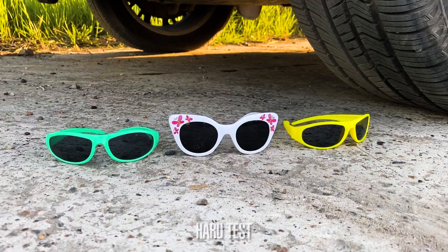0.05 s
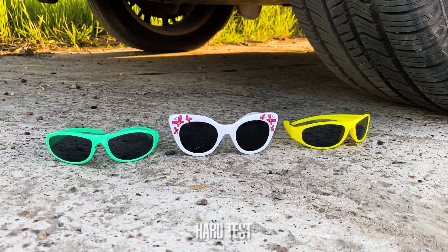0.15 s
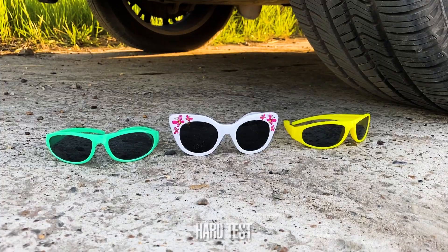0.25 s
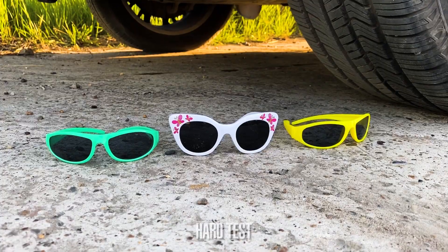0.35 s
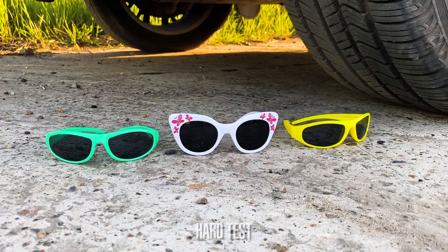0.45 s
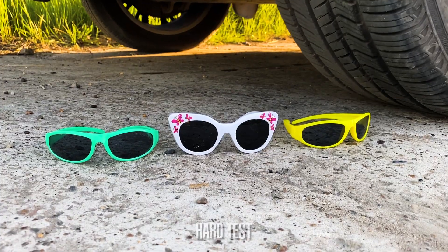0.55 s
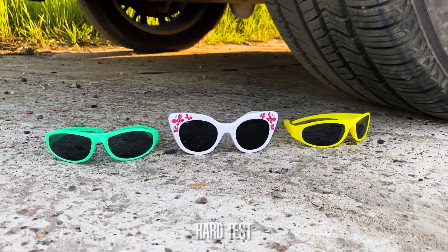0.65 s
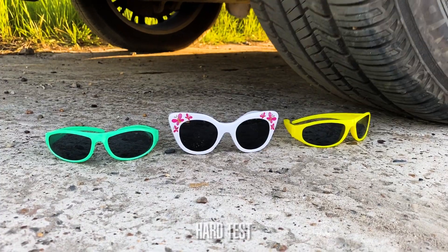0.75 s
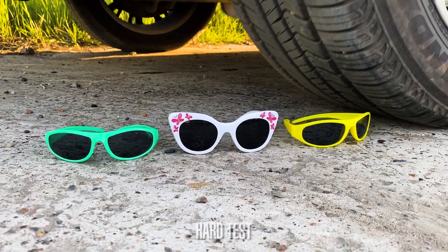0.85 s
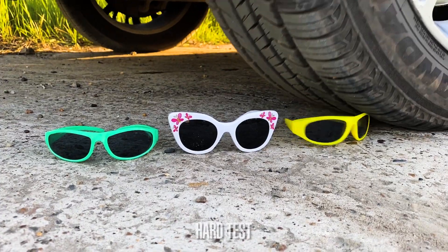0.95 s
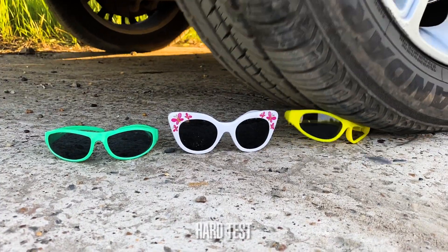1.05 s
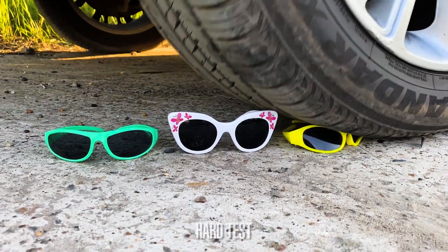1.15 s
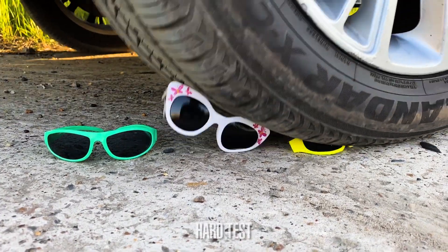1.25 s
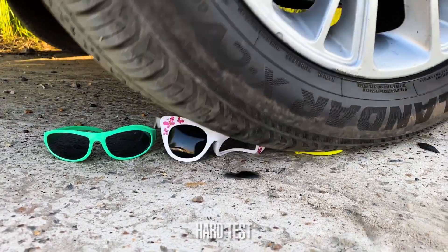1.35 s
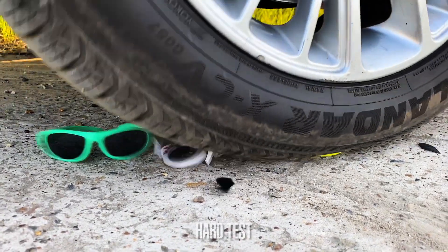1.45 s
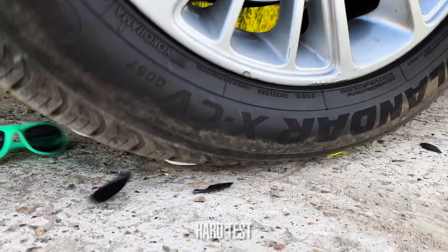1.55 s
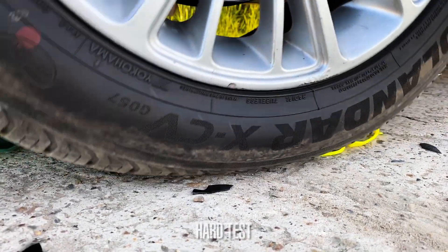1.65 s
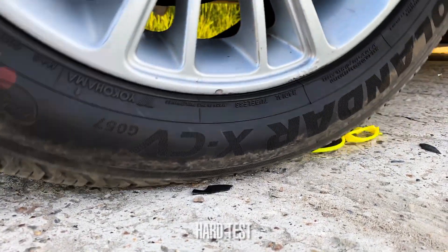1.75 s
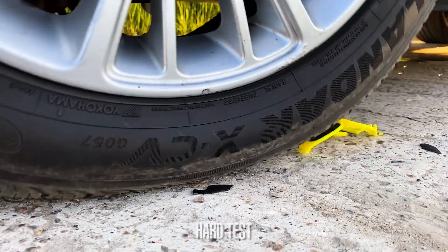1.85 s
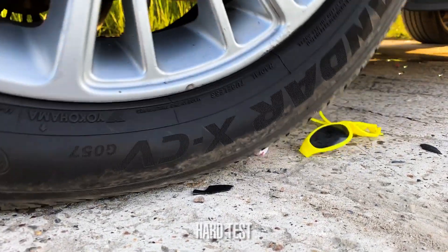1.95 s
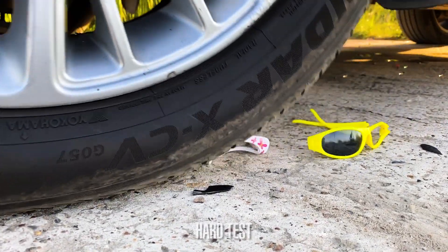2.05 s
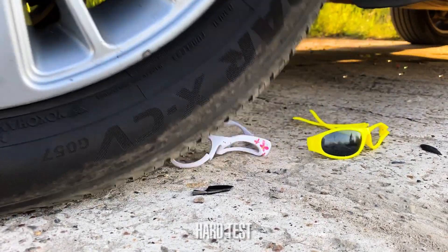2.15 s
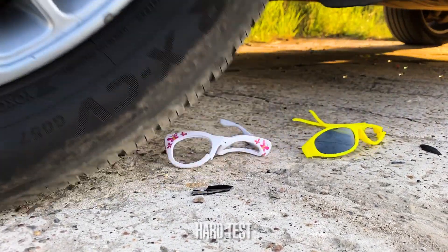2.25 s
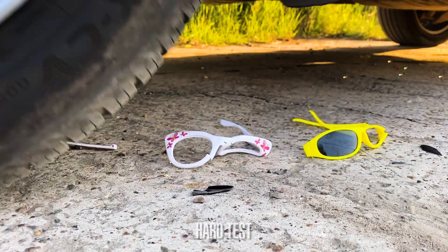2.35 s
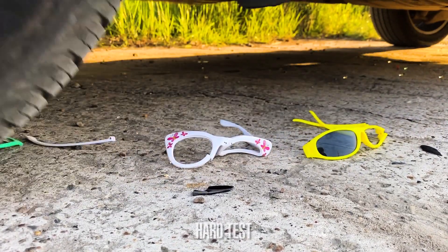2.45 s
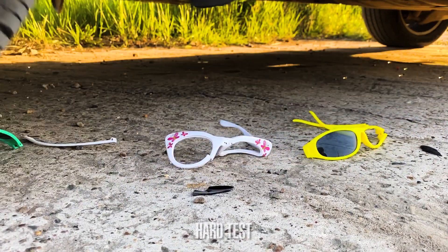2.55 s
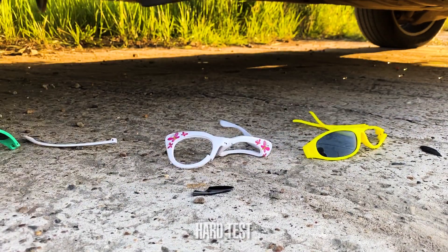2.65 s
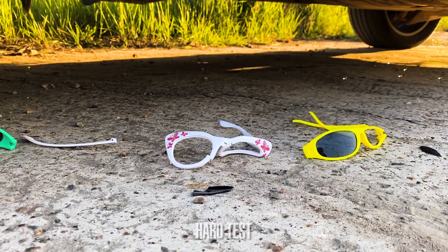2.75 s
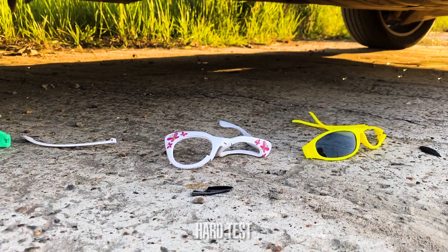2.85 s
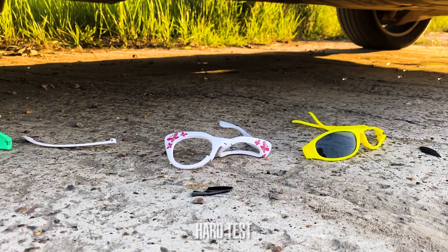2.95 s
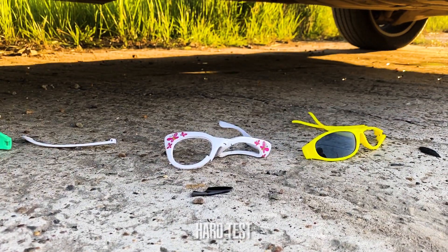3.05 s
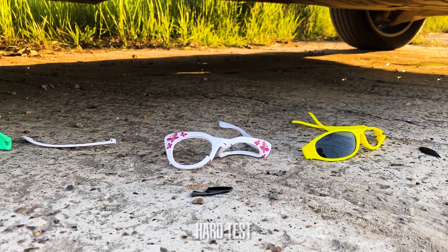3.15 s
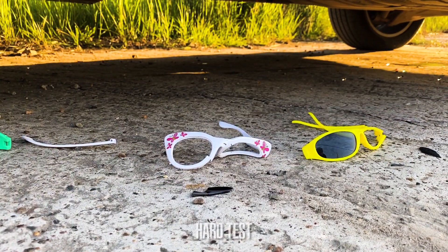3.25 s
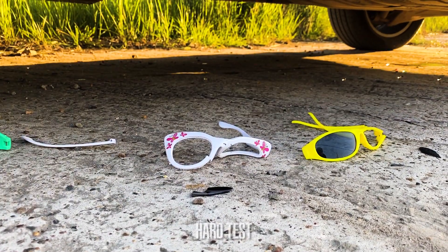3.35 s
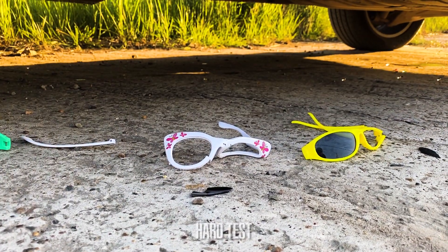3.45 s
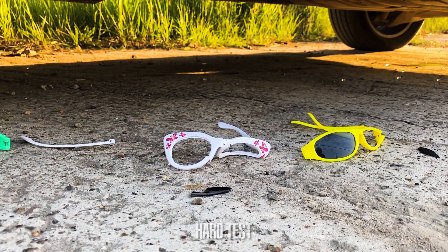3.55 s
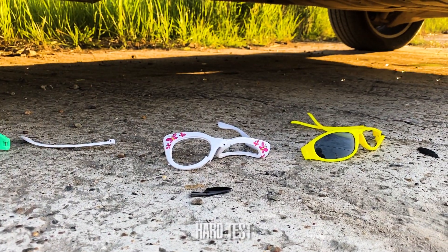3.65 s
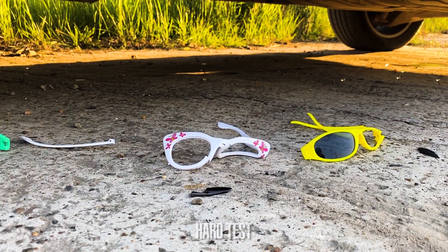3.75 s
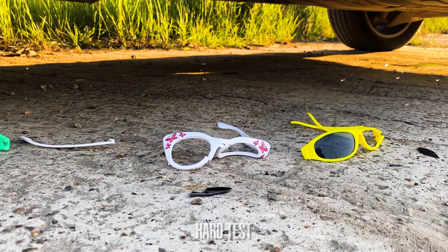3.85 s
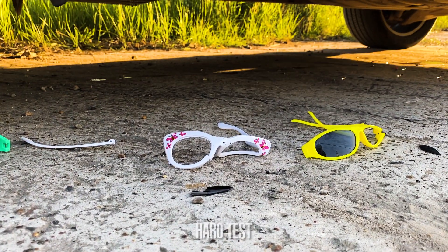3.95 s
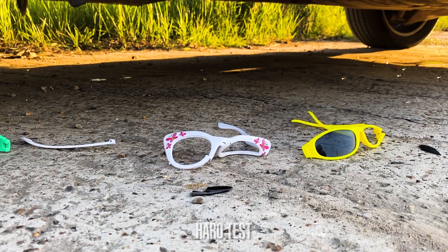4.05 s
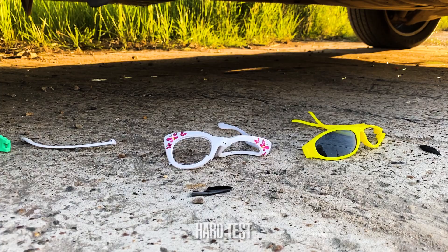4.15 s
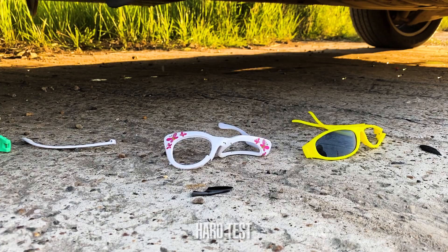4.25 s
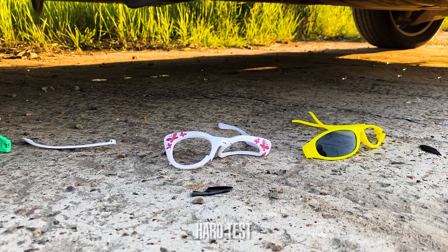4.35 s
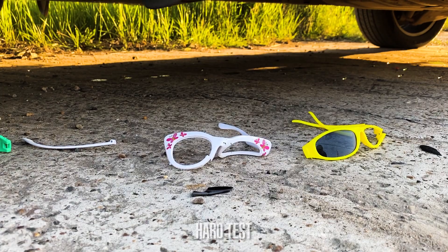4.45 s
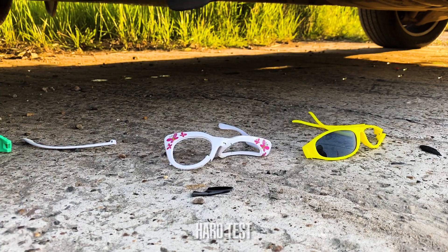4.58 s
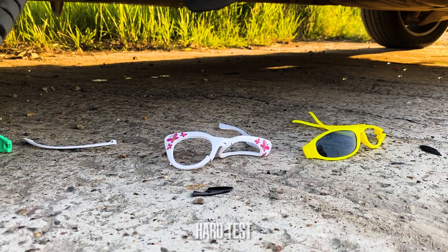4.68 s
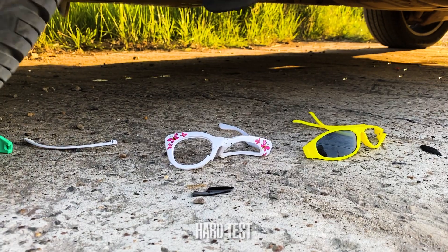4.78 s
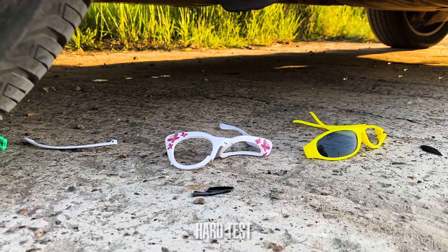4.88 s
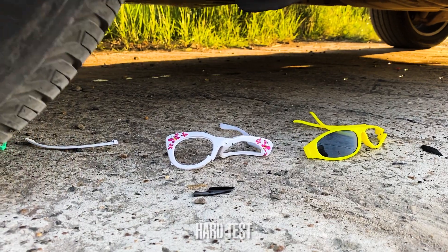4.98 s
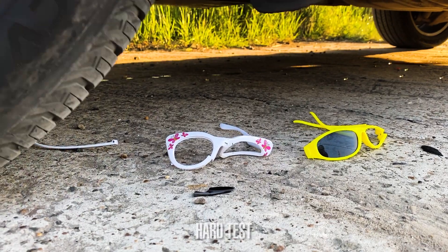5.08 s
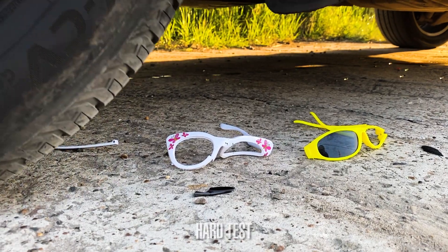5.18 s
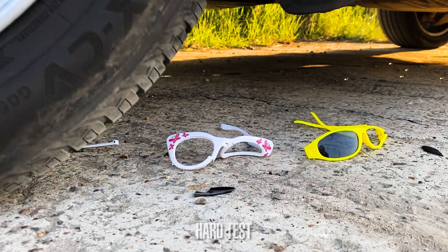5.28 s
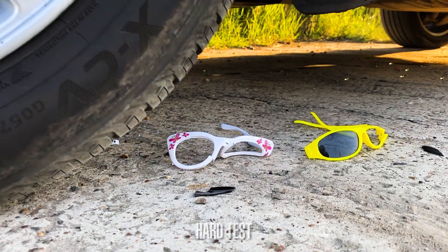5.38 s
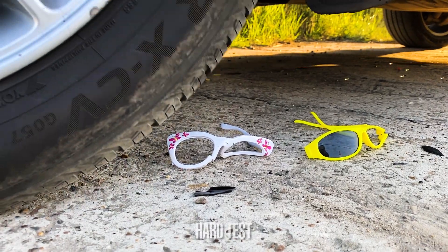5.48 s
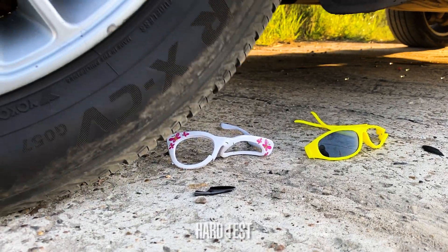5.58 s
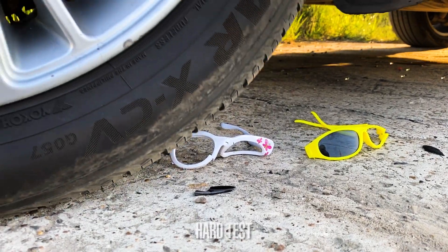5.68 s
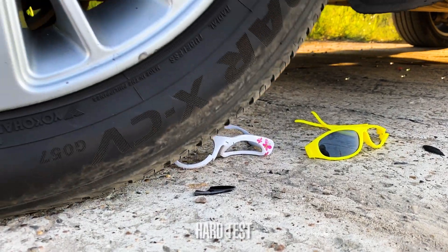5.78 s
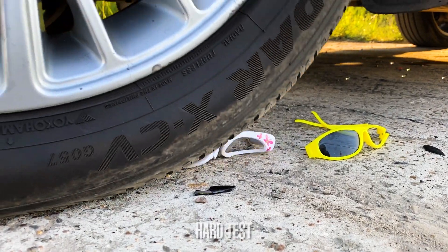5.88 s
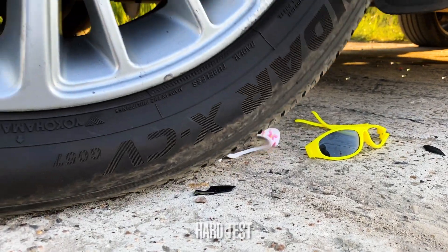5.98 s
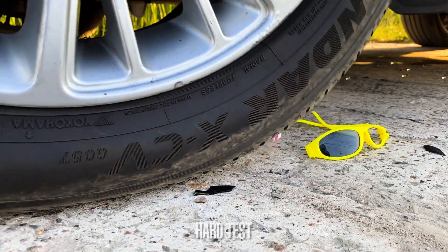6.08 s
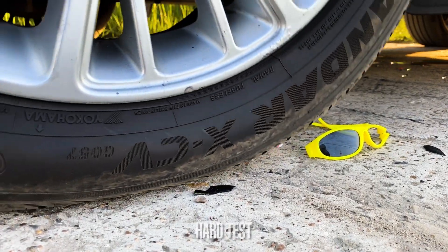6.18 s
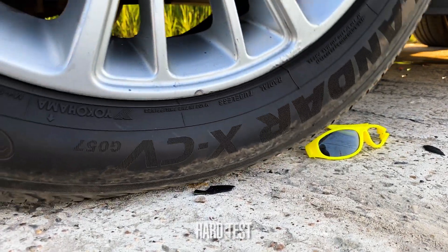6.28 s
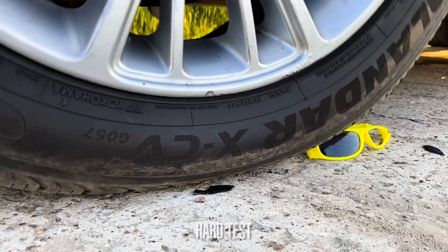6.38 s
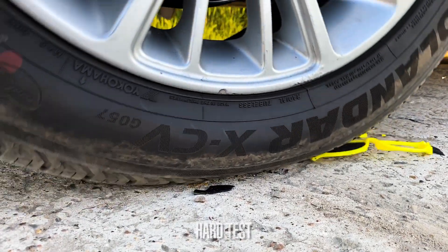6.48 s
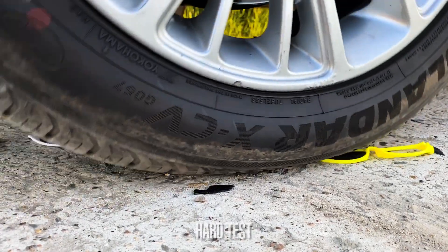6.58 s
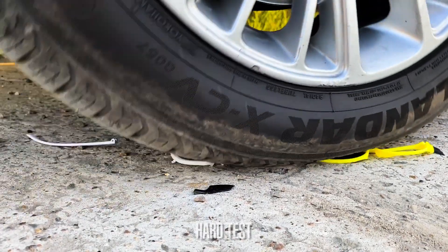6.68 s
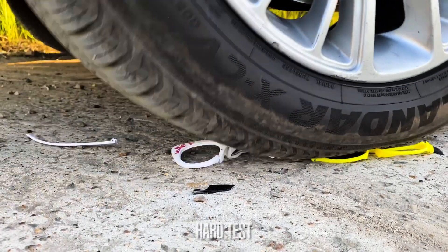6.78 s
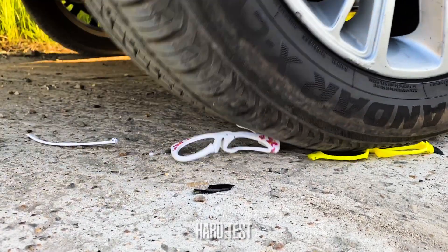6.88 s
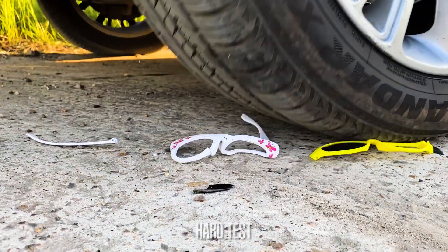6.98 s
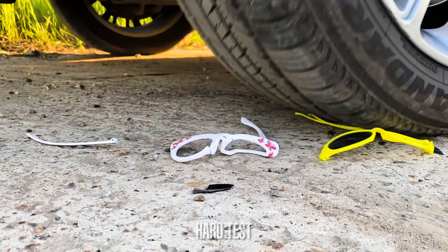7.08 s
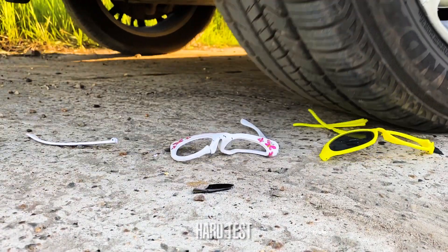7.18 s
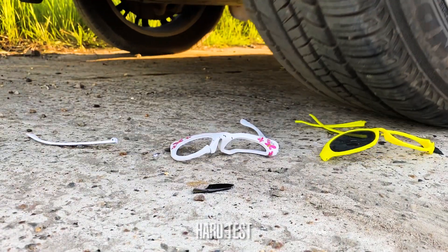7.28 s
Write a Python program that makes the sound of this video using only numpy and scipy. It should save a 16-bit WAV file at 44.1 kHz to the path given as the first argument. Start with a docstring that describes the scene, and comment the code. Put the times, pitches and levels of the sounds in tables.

```python
"""A cooling fan hums over the low throb and roar of an idling engine; then plastic snaps, knocks and crunches.
A car creeps forward and back over three plastic frames on concrete, the microphone on the ground beside them.
Sine lines make the hum and throb, coloured noise the roar and hiss, and resonators the whine and drone.
Noise bursts ring the broken pieces, falling sines knock, noise grains grind and low sines thud.
The volume of the car sound is turned up and down, partly in sudden steps."""
import sys
import numpy as np
from scipy import signal
from scipy.fft import rfft, irfft, next_fast_len
from scipy.io import wavfile
from scipy.ndimage import uniform_filter1d

SR = 44100
rng = np.random.default_rng(int(sys.argv[2]) if len(sys.argv) > 2 else 0)


def to_wav(s):
    """Save 16-bit WAV."""
    ch = np.atleast_2d(s).T  # columns
    pcm = np.round(np.clip(ch, -1, 1) * 32767)  # PCM
    wavfile.write(sys.argv[1], SR, pcm.astype(np.int16))


N = 322812
TIME = np.arange(N) / SR


def from_db(db):
    """Logarithmic level: decibels to amplitude gain."""
    return 10 ** (np.asarray(db) / 20)


def rms_one(x):
    """Power normalisation: scale to rms 1."""
    return x / np.sqrt(np.mean(x ** 2) + 1e-20)


def loudest_one(x):
    """Short-time power: scale so that the loudest stretch of 30 samples has peak height about 1."""
    power = uniform_filter1d(np.mean(x ** 2, 0), size=30)
    return x / np.sqrt(2 * power.max() + 1e-20)


def in_time(rows):
    """Linear interpolation: one value per sample for each column after t."""
    s, *columns = np.transpose(rows)
    return [np.interp(TIME, s, column) for column in columns]


def at_hz(points, hz):
    """Logarithmic frequency: interpolate a table of (f/Hz, value)."""
    table_hz, values = np.array(points).T
    return np.interp(np.log(hz), np.log(table_hz), values)


def drift(rate_hz):
    """Low-passed random process: slow fluctuation with rms 1."""
    step = 40   # samples per slow value
    r = np.exp(-2 * np.pi * step * rate_hz / SR)
    white = rng.standard_normal(N // step + 2002)
    slow = signal.lfilter([1], [1, -2 * r, r * r], white)[2000:]   # the settling part is dropped
    return np.interp(np.arange(N) / step, np.arange(len(slow)), rms_one(slow))


def noise(spectrum, alike, lead=((1, 0), (2, 0))):
    """Interchannel coherence: stereo noise of given colour, likeness and left phase lead, at rms 1."""
    size = next_fast_len(N)
    hz = np.maximum(np.arange(size // 2 + 1) * SR / size, 1)
    mid, side = rfft(rng.standard_normal((2, size))) * from_db(at_hz(spectrum, hz))
    likeness = np.clip(at_hz(alike, hz), 0, 1)
    mid = np.sqrt(1 + likeness) * mid
    side = np.sqrt(1 - likeness) * side
    left = mid + side
    right = (mid - side) * np.exp(-1j * at_hz(lead, hz))
    return rms_one(irfft([left, right], size)[:, :N])


def band(x, kind, hz):
    """Frequency selection: second-order Butterworth filter."""
    return signal.sosfilt(signal.butter(2, hz, kind, fs=SR, output="sos"), x)


def resonance(x, hz, width_hz):
    """Damped oscillator: a two-pole peak with gain about 1 on top."""
    r = np.exp(-np.pi * width_hz / SR)
    zeros = np.array([1, 0, -1]) * (1 - r * r) / 2
    return signal.lfilter(zeros, [1, -2 * r * np.cos(2 * np.pi * hz / SR), r * r], x)


def resonant_bands(white, hz, width_hz):
    """Cascaded resonance: the peak applied twice narrows noise to a blurred tone at rms 1."""
    return rms_one(resonance(resonance(white, hz, width_hz), hz, width_hz))


# Blade passing rate before its random drift: (t/s, f/Hz)
BLADE_RATE = [(0, 146.5), (.47, 144.3), (.9, 135.8), (1.59, 139.7), (3.5, 141.1), (4.05, 140.5),
              (6.0, 140.4), (6.3, 146.7), (6.56, 146.4), (6.95, 139.7), (7.32, 134.7)]
# Lines of the fan: (multiple of the blade rate, base level/dB)
FAN_LINES = [(.5, -8.5), (1, 0), (2, -19), (5, -21)]


def fan(late_ms, bump_db):
    """Blade-passing tone: sine lines at multiples of a drifting blade rate."""
    rate_hz = in_time(BLADE_RATE)[0] * (1 + 0.00588 * drift(3.55))
    blades = 2 * np.pi * np.cumsum(rate_hz) / SR
    half_db = -5 + 22 * late_ms - bump_db   # the lowest line takes no part in the level bumps
    second_db = 11 / (1 + np.exp((TIME - 0.7) / 0.037)) - 1.5   # stronger until about 0.7 s
    fifth_db = -11 + 49 * late_ms
    hum = 0
    for (multiple, db), share_db in zip(FAN_LINES, [half_db, 0, second_db, fifth_db]):
        gain = from_db(db + share_db + 1.2 * drift(2.6))
        hum = hum + gain * np.sin(multiple * blades + rng.uniform(0, 6.7))
    return hum


# Engine firings, idle with one touch of throttle: (t/s, f/Hz before drift, throb level relative to hum/dB)
FIRINGS = [(0, 44.3, -5), (.7, 43.2, -21), (2.6, 43.46, -7.5), (5.1, 44.2, -13), (6.06, 44.4, -13),
           (6.24, 52.7, -0.5), (6.5, 55.2, -15), (6.97, 49.2, -6), (7.32, 48.4, -32)]


def firing_throb(bump_db):
    """Periodic excitation: firing rate, its drifting phase, and a throb of two harmonics."""
    firing_hz, throb_db = in_time(FIRINGS)
    firing = 2 * np.pi * np.cumsum(firing_hz * (1 + 0.0057 * drift(1.15))) / SR
    gain = from_db(throb_db - bump_db + 0.63 * drift(5))   # takes no part in the level bumps
    return firing_hz, firing, gain * (np.sin(firing) + 0.35 * np.sin(2 * firing))


# Roar colour: (f/Hz, relative density level/dB)
ROAR_COLOUR = [(25, -20), (38, -27), (70, -9), (100, -10), (190, -12), (250, -18.5), (330, -17.5),
               (620, -19.5), (900, -22.5), (1380, -27), (2900, -33), (4800, -40), (7200, -42), (8200, -57)]
# Roar coherence: (f/Hz, left-right likeness)
ROAR_LIKENESS = [(50, .998), (150, 0.82), (400, 0.89), (800, 0.77), (1400, 0.59), (3000, 0.043),
                 (7000, 0.073)]


def roar(roar_db, bright_db, firing):
    """Amplitude modulation: broadband noise pulses with the firings and reflects from the concrete."""
    whole = noise(ROAR_COLOUR, ROAR_LIKENESS)
    top = band(whole, "high", 1100)
    lows = (whole - top) * from_db(1.64 * drift(21.4))   # the lows are lumpier
    sound = lows + from_db(bright_db + 0.55 * drift(15)) * top
    lag = round(1.82 * SR / 1000)   # ms to samples: the path by way of the concrete
    sound[:, lag:] += 0.14 * band(sound, "high", 270)[:, :N - lag]
    # alternate cylinders are louder, so the roar pulses at half the firing rate too
    pulse_db = 0.9 * np.sin(firing) + 0.24 * np.sin(firing / 2)
    return sound * from_db(roar_db + 1.0 + pulse_db)


# Blurred bands of the drone: (f/Hz, width of each pass/Hz, relative level/dB)
DRONE_BANDS = [(594, 94, 0.5), (1027, 90, -14.5), (1920, 210, -12.5), (2940, 280, -14)]


def drone(white, hum_db, firing_hz):
    """Resonant filtering: noise bands grow with the hum level and the firing rate."""
    level_db = -5 + 0.44 * hum_db + 0.5 * (firing_hz - 43.8)   # 0.5 dB per Hz over idle
    bands = sum(from_db(db) * resonant_bands(white, hz, width_hz) for hz, width_hz, db in DRONE_BANDS)
    return from_db(level_db) * bands


# Belt-driven parts: (f/Hz, width of each pass/Hz, relative level/dB)
WHINE_BANDS = [(2240, 160, -5), (2950, 300, -2), (4400, 700, 2), (4680, 70, -5)]


def whine(white, late_ms):
    """Narrow-band noise: belt-driven parts sing in bands of wandering level."""
    bands = 0
    for hz, width_hz, db in WHINE_BANDS:
        bands = bands + from_db(db + 1.22 * drift(3.7)) * resonant_bands(white, hz, width_hz)
    return from_db(-39 + 62 * late_ms) * bands


# Treble colour: (f/Hz, relative density level/dB)
HISS_COLOUR = [(6500, -41), (7800, 14), (8600, -2), (10000, 5.5), (11200, -0.5), (12000, -58), (13000, 1.5),
               (14500, 4.5), (15500, -6), (16800, -28)]
# Treble phase between channels: (f/Hz, left lead/rad)
TREBLE_LEAD = [(8000, -2.5), (8800, -.8), (9500, .8), (10700, -.5), (13400, .6), (14800, -1.3)]


def hiss(roar_db, bright_db):
    """Partially coherent noise: treble follows the roar and brightness with chance fluctuation."""
    treble = noise(HISS_COLOUR, [(1, 0.59), (2, 0.59)], TREBLE_LEAD)
    return treble * from_db(-25.5 + roar_db + bright_db + 1.8 * drift(12))


# Volume of the car sound, turned up and down, partly in sudden steps:
# (t/s, hum base level/dB, roar level relative to hum/dB)
CAR_VOLUME = [(0, -38.5, -0.5), (1.0, -36.5, -3), (1.075, -42, -1.5), (1.3, -51.5, 12), (1.6, -44.5, -3.5),
              (1.75, -35.5, -3), (2.113, -36.5, -2.5), (2.118, -51, -2.5), (2.65, -45.5, -4),
              (3.9, -45, -3.5), (4.5, -40.5, -5), (5.03, -39.5, -4), (5.25, -32.5, -5.5), (5.34, -23, -5.5),
              (5.75, -22.5, -8.5), (6.3, -23, -3.5), (6.5, -24.5, -0.5), (6.55, -26.5, -3.5),
              (7.013, -29, -1.5), (7.018, -39.5, -4), (7.32, -43, -2)]
# The engine bay moves past: (t/s, right channel delay/ms, brightness level/dB)
ENGINE_PLACE = [(0, .036, -1), (1.3, 0.086, 1), (3.4, 0.31, 1), (5.0, 0.21, 0.5), (5.35, 0.19, 2),
                (5.9, 0.16, 2.5), (6.7, 0.057, 3.5), (7.32, .04, 1)]


def car():
    """Superposition: all engine sources share one volume, with interchannel delay and level difference."""
    hum_db, roar_db = in_time(CAR_VOLUME)
    late_ms, bright_db = in_time(ENGINE_PLACE)
    bump_db = level_bumps()
    firing_hz, firing, throb = firing_throb(bump_db)
    white = rng.standard_normal((2, N))   # shared by drone and whine
    near = np.sqrt(2) * (fan(late_ms, bump_db) + throb) + drone(white[0], hum_db + bump_db * 0, firing_hz)
    near = near + roar(roar_db, bright_db, firing) + whine(white, late_ms)
    near[1] = np.interp(TIME - late_ms / 1000, TIME, near[1])
    pan_db = -0.3 + 4.1 * late_ms   # left over right
    panned = near * from_db([pan_db / 2, -pan_db / 2])
    return from_db(hum_db + bump_db) * (panned + hiss(roar_db, bright_db))


# Colour of splintering plastic: (f/Hz, relative density level/dB)
PLASTIC_COLOUR = [(710, -10), (1200, -15.5), (1560, -12), (2690, -4.5), (3430, -5), (5630, -3), (8470, -10),
                  (10700, -11), (12100, -25), (14400, -5.5), (16800, -38)]


def splinter():
    """Spectral shaping: stereo noise with the colour of breaking plastic."""
    likeness = [(1500, 0.75), (3000, 0.79), (5500, 0.67), (9000, 0.65)]
    lead = [(1000, 0.28), (3000, 0.21), (5500, 1.8)] + TREBLE_LEAD
    return noise(PLASTIC_COLOUR, likeness, lead)


# Grit and splinters under the tread, one list forward and one back: (t/s, relative level/dB)
GRIT_LEVEL = [
    [(1.0, -49), (1.05, -34), (1.1, -66), (1.33, -33), (1.41, -54), (1.6, -44.5), (1.9, -38), (2.116, -43)],
    [(4.93, -62), (5.12, -27), (5.22, -57), (5.8, -59), (6.1, -36), (6.54, -47), (6.62, -63), (6.86, -52),
     (6.92, -37), (7.016, -44)],
]


def grit():
    """Random point process: dense uneven grains, each a short puff of band-filtered splintering noise."""
    level = 0
    for rows in GRIT_LEVEL:
        active = (TIME >= rows[0][0]) * (TIME < rows[-1][0])
        level = level + from_db(in_time(rows)[0]) * active
    fade = np.exp(-1 / (0.0018 * SR))   # decay over 1.8 ms
    whole, grains = splinter(), 0
    clumps = from_db(3.0 * drift(21.0))
    for hz in 1700 * 2 ** np.arange(0, 3.2, 0.5):
        sizes = from_db(5.0 * np.minimum(rng.exponential(1, N), 4.5))
        born = rng.random(N) < 120 * clumps / SR   # 120 grains per second, times the clumping
        puffs = signal.lfilter([1], [1, -fade], sizes * born + 1e-18)
        grains = grains + resonance(whole, hz, 0.18 * hz) * puffs
    return from_db(-6.0) * level * rms_one(grains)


# Brief level changes of the background: (t/s, level change/dB, length with edges/s)
LEVEL_BUMPS = [(1.009, 17, 0.071), (4.965, 16.5, 0.041), (6.423, -2.5, 0.036)]


def level_bumps():
    """Trapezoidal envelope: each brief level change in dB has an edge, a hold and an edge."""
    total_db = 0
    for s, db, length in LEVEL_BUMPS:
        inside = np.minimum(TIME - s, s + length - TIME)
        total_db = total_db + db * np.clip(inside / 0.0133, 0, 1)   # edge in seconds
    return total_db


# A frame knocks on the concrete: (t/s, relative level/dB, settled f/Hz)
FRAME_KNOCKS = [(1.0176, -23.5, 690), (1.0633, -21.5, 382), (1.154, -32, 740), (1.174, -35, 770),
                (1.212, -17.5, 940), (1.2155, -21, 440), (1.2272, -16, 653), (1.258, -11.5, 593),
                (1.2697, -8, 587), (1.2915, -21, 410), (1.3032, -21.5, 985), (1.361, -20, 845),
                (1.37, -21.5, 332), (1.413, -36, 500), (1.4258, -20, 510), (1.4413, -30, 472),
                (1.4853, -17, 613), (1.5309, -21, 806), (1.695, -31, 730), (1.7736, -24.5, 600),
                (1.8648, -32.5, 810), (1.9047, -27, 860), (1.9357, -22.5, 388), (1.947, -24, 382),
                (1.9923, -22.5, 620), (2.0679, -22.5, 720), (2.206, -39.5, 740), (4.9508, -17, 940),
                (4.996, -24, 400), (5.1009, -21.5, 930), (5.1151, -18.5, 428), (5.1297, -22.5, 580),
                (5.2137, -23.5, 630), (5.3764, -23, 775), (5.5071, -14.5, 627), (6.4663, -22, 670),
                (6.4834, -17, 1050), (6.4954, -22, 674), (6.8203, -6, 490), (6.8629, -6.5, 620),
                (6.916, -17, 423)]


def knocks():
    """Damped vibration: a knock falls in pitch while the frame grinds on the concrete around that pitch."""
    builds_cycles, rings_cycles = 0.733, 1.32
    size = 3000
    out, t = np.zeros((2, N + size)), np.arange(size) / SR
    rough = noise([(150, 7), (2500, -23)], [(200, 1.0), (1500, 0.45)], [(200, 0.15), (1200, 0.92)])
    starts = (rng.random(len(FRAME_KNOCKS)) * (N - size)).astype(int)
    for (s, db, hz), i in zip(FRAME_KNOCKS, starts):
        cycles = hz * (t + 0.0016 * (1 - np.exp(-t / 0.0028)))   # starts sharp and settles
        knock = np.sin(2 * np.pi * cycles) + 0.15 * np.sin(2 * np.pi * 1.7 * cycles)
        builds = (1 - np.exp(-t * hz / builds_cycles)) ** 2
        knock *= from_db(11.5) * np.exp(-t * hz / rings_cycles) * builds
        grind = resonance(rough[:, i:i + size] * np.exp(-t / 0.0063) * builds, hz, 0.85 * hz)
        at = round((s - builds_cycles / hz) * SR)
        out[:, at:at + size] += from_db(db) * (knock + from_db(-1.0) * loudest_one(grind))
    return out[:, :N]


# Plastic snaps and short scrapes:
# (t/s, overall level/dB, ring f/Hz, relative noise level/dB, relative treble level/dB, nominal length/ms)
PLASTIC_SNAPS = [(1.0171, -15, 1880, 7.5, -9, 2.4), (1.0512, -22, 2900, 7.5, -10, 10),
                 (1.0612, -10, 7160, 6.5, -4, 2.9), (1.091, -38, 1700, 7, 0, 4.4),
                 (1.1094, -42.5, 3850, 5, 5, 4.8), (1.1537, -26.5, 2840, -8, -25, 2.1),
                 (1.1723, -29, 1460, -8, -25, 4.3), (1.21, -12.5, 1490, 3.5, -13, 5.2),
                 (1.2162, -14.5, 4100, -2, -14, 2.2), (1.2264, -8, 2200, -4, -18, 3.5),
                 (1.25, -7.5, 3960, 4.5, -25, 1.7), (1.2619, -10.5, 2520, 3.5, -6, 6.4),
                 (1.2673, -8.5, 1640, -1, -7, 1.7), (1.283, -18, 2670, -9, -27, 1.7),
                 (1.292, -26, 1660, 11, -9, 3.3), (1.303, -15.5, 4860, 5.5, 2.5, 2.3),
                 (1.339, -33, 4620, 8, 0, 22), (1.3596, -14.5, 2450, 7, 1, 1.7),
                 (1.3681, -15, 7650, 7.5, 1, 5.6), (1.373, -25, 7400, -2, -2, 7.1),
                 (1.4236, -20.5, 1540, -6, -17, 7.1), (1.4402, -20.5, 4930, 5.5, -4, 3.7),
                 (1.4492, -22, 1870, -7, -21, 4.5), (1.4839, -13.5, 6070, 5, -1.5, 8),
                 (1.529, -15.5, 7100, 0, -1.5, 9.3), (1.5787, -32.5, 6750, 4, -2, 2.3),
                 (1.67, -32.5, 7680, -16, -10, 9.7), (1.7191, -36, 4770, -3, -20, 2.7),
                 (1.7394, -37, 7530, -15, 10, 1.3), (1.772, -36, 6170, 16, 8, 2.2),
                 (1.8229, -28, 6950, 9, -8, 1.3), (1.862, -28, 2990, -2, -15, 5.8),
                 (1.873, -28.5, 2880, -10, -26, 33), (1.9144, -23.5, 2830, 6, -13, 2.6),
                 (1.923, -15, 2880, 7, -28, 3.6), (1.9352, -10.5, 3150, 6.5, -4.5, 7.8),
                 (1.9591, -25.5, 4467, -4, -5, 3), (2.035, -32, 6000, -2, 1.5, 14),
                 (2.0666, -15, 3400, 11.5, 4, 1.3), (2.066, -26.5, 3750, 10.5, -8, 14),
                 (2.092, -37, 6000, 1, -5, 2.2), (2.148, -49.5, 2180, 4.5, 1, 2.8),
                 (2.289, -51, 5000, 2, 0, 2), (2.452, -41, 6700, 11.5, 3, 2.1),
                 (2.471, -38, 6370, -10, -5, 1.9), (2.5325, -41, 2700, 6, -11, 3.4),
                 (2.546, -41, 2700, 1, -6, 3.5), (2.8585, -40, 2780, -6, -29, 1.7),
                 (3.952, -39.5, 1350, -9, -24, 39), (4.3552, -33.5, 4430, -5, -9, 2.6),
                 (4.364, -30.5, 4280, -13, -21, 2.5), (4.8618, -37.5, 2630, 1, -24, 2.8),
                 (4.92, -36, 2590, 2, -13, 4.9), (4.949, 2, 2970, -11.5, -24, 7.4),
                 (4.9502, -3, 2180, -6, -22, 5.5), (4.9572, -17, 2700, -23, -32, 1.9),
                 (4.982, -5, 2200, -1, -19, 2.5), (4.994, -10, 3060, 6.5, -0.5, 3.1),
                 (5.0442, -32, 5520, 13.5, -14, 3), (5.0581, -11.5, 4830, 2, -3.5, 2.5),
                 (5.083, -11, 2700, 2.5, -19, 2.2), (5.0992, -16, 6100, 8.5, -1, 2.7),
                 (5.1151, -13.5, 5800, 7, -4, 2.1), (5.129, -21, 2500, 13.5, 6, 6.9),
                 (5.1734, -37, 2220, 13, 6, 3.8), (5.2124, -12.5, 2480, 2, -2.5, 2.56),
                 (5.3758, -15, 6550, 3.5, -17, 1.75), (5.5061, -13.5, 6760, 9, -4, 2),
                 (5.507, -21.5, 3200, 10.5, 0, 12), (6.079, -35, 3900, 0, 9.5, 3.4),
                 (6.1396, -18, 5370, 11.5, 3, 2), (6.141, -32, 5000, 11, 1, 18),
                 (6.167, -29, 5000, 5, 2, 5.2), (6.193, -14.5, 6640, -8, -17, 2),
                 (6.29, -25.5, 6700, 3, -3.5, 4), (6.464, -21, 1660, 1, -22, 4.7),
                 (6.4835, -14, 1850, -12, -29, 1.8), (6.494, -11.5, 1520, 3, -9, 6.8),
                 (6.499, -1, 1900, -5, -13, 1.1), (6.5142, -15.5, 3790, 17, 1, 2.8),
                 (6.523, -12, 2080, -7, -26, 1.8), (6.5285, -13.5, 2220, 0, -11, 9.6),
                 (6.535, -23, 4290, 2, -3, 8.2), (6.5899, -23.5, 3550, 12.5, 7, 2.7),
                 (6.6823, -28, 6640, -4, -5, 2.5), (6.7347, -27, 1810, 10, -7, 1.5),
                 (6.819, -9.5, 1620, -2, -7.5, 2.6), (6.8617, -12, 1713, 10, -1, 3.2),
                 (6.913, -20.5, 1900, 3, -4, 4), (6.923, -19, 5640, 11, 8, 2.6),
                 (6.937, -14.5, 4240, 0, 4, 1.9), (6.954, -13.5, 4440, 6, -5, 1.1),
                 (6.975, -27, 4050, 9.5, -2, 4.1), (7.0964, -41, 6760, 6, -2, 2.5)]
# Where the breaking happens: (t/s, left-right level difference/dB)
BREAK_PAN = [(1.04, -4.5), (1.3, -1.5), (2.07, 1), (4.95, -0.5), (6.14, -1), (6.5, -3), (6.82, 0)]


def snaps():
    """Impulsive excitation: each splintering burst rings the piece and leaves a rattling tail."""
    size = 3000
    out, t = np.zeros((2, N + size)), np.arange(size) / SR
    whole = splinter()
    low = band(whole, "low", 11000)
    high = band(band(whole, "high", 7600), "high", 7600)
    # the fracture runs in jerks
    ragged = from_db(4.3 * rms_one(band(rng.standard_normal(N), "low", 900)))
    starts = (rng.random(len(PLASTIC_SNAPS)) * (N - size)).astype(int)
    for (s, db, ring_hz, broad_db, treble_db, length_ms), i in zip(PLASTIC_SNAPS, starts):
        pan_db = np.interp(s, *np.transpose(BREAK_PAN))
        rise = np.clip(0.374 * length_ms, 0.2, 2) / 1000   # seconds
        fall = max(length_ms / 1000 - rise, 0.0003)
        after = np.maximum(t - rise, 0)
        # the fracture builds, lets go with a spike and dies
        start = np.minimum(t / rise, 1) ** 0.51
        spike = 1 + 0.5 * np.exp(-((t - rise) / 0.000086) ** 2)
        burst = start * np.exp(-(after / fall) ** 1.38) * spike
        rattle = start * from_db(-23.5) * np.exp(-after / 0.011) * ragged[i:i + size]
        body = low[:, i:i + size]
        # clean breaks ring on a narrower band
        width_hz = ring_hz * np.interp(broad_db, [-12, 0], [0.18, 0.5])
        ring = resonance(body * (burst + 0.31 * rattle), ring_hz, width_hz)
        ring = resonance(ring, ring_hz, 0.93 * width_hz)
        crack = from_db(-3.5) * loudest_one(ring)
        crack += from_db(broad_db - 6.0) * loudest_one(body * burst) + 0.56 * body * rattle
        crack += from_db(treble_db) * loudest_one(high[:, i:i + size] * (burst + rattle))
        at = round((s - 0.0004) * SR)
        out[:, at:at + size] += from_db(db + np.array([[pan_db / 2], [-pan_db / 2]])) * crack
    return out[:, :N]


def underside(x):
    """Multiple reflection: a few dull echoes between concrete and the floor of the car."""
    # (delay/ms, level/dB)
    echoes = [(1.75, -51.5), (3.1, -31.0), (5.3, -16.5), (8.1, -24), (12.7, -26), (17.9, -25)]
    out = np.zeros_like(x)
    for k, (ms, db) in enumerate(echoes):
        lag = round(ms * SR / 1000)
        source = x if k % 2 else x[::-1]   # every other echo swaps sides
        out[:, lag:] += from_db(db) * source[:, :N - lag]
    return band(out, "low", 8300)


# The tyre wall jolts as a frame gives way: (t/s, initial level/dB, f/Hz)
TYRE_THUDS = [(1.066, -20, 70), (1.271, -17.5, 90), (1.371, -23, 60), (1.491, -12.5, 61.5),
              (1.532, -15.5, 55), (1.939, -10, 207), (3.969, -29, 45.2), (4.958, -12, 116),
              (4.998, -11.5, 77.4), (5.116, -16.5, 202), (6.512, -8, 120)]


def thuds():
    """Heavily damped oscillation: a soft low push dies in about two cycles."""
    out, t = np.zeros(N), np.arange(6000) / SR
    for s, db, hz in TYRE_THUDS:
        at = round(s * SR)
        out[at:at + len(t)] += from_db(db) * np.sin(2 * np.pi * hz * t) * np.exp(-t * hz / 0.47)
    return out


def scene():
    """Linear superposition: the car over the breaking plastic and its echoes."""
    plastic = snaps() + knocks() + grit()
    return car() + plastic + underside(plastic) + thuds()


def record(dry):
    """Band limiting and saturation: steep bass cut, rounded peaks, top cut."""
    cut = signal.sosfilt(signal.butter(5, 35, "high", fs=SR, output="sos"), dry)
    rounded = 1.072 * np.tanh(cut / 1.173)
    return signal.sosfilt(signal.cheby2(14, 75, 17100, fs=SR, output="sos"), rounded)


dry = scene()
out = record(dry)
to_wav(out)
```